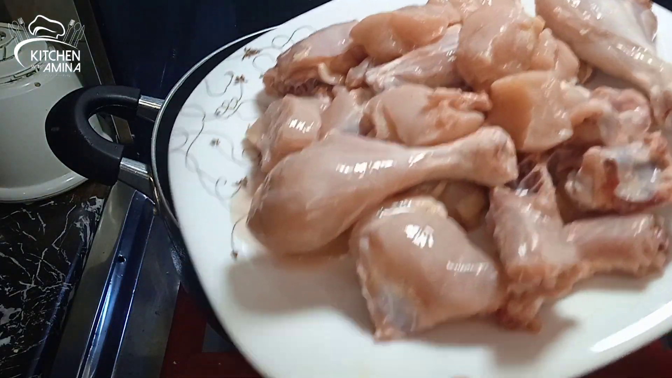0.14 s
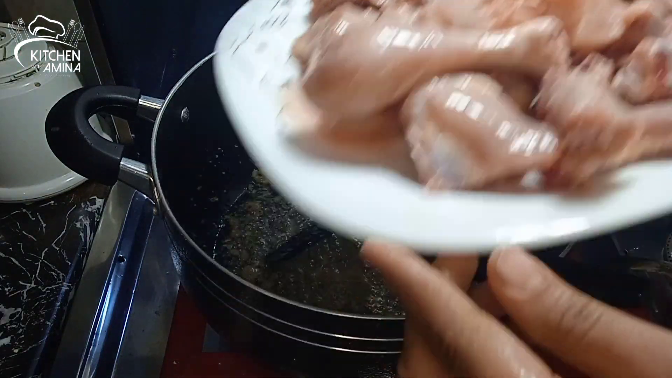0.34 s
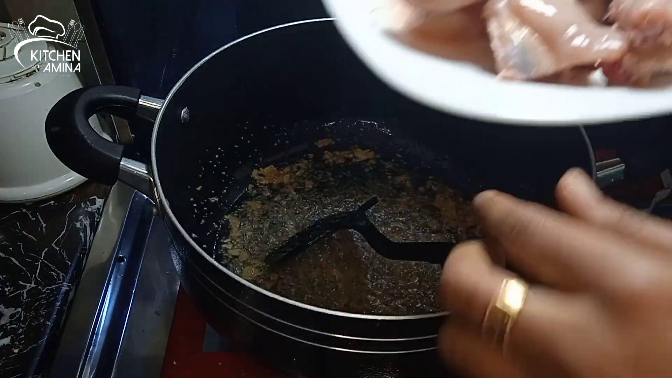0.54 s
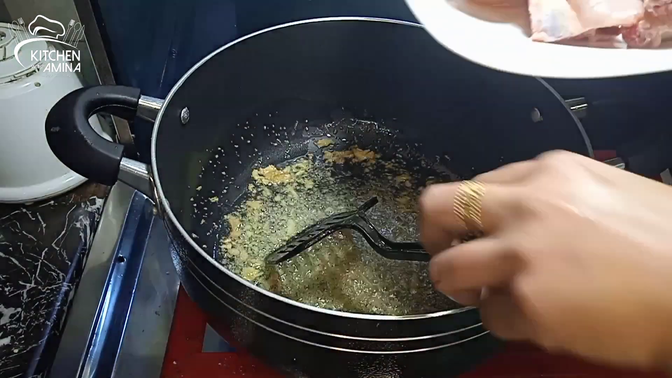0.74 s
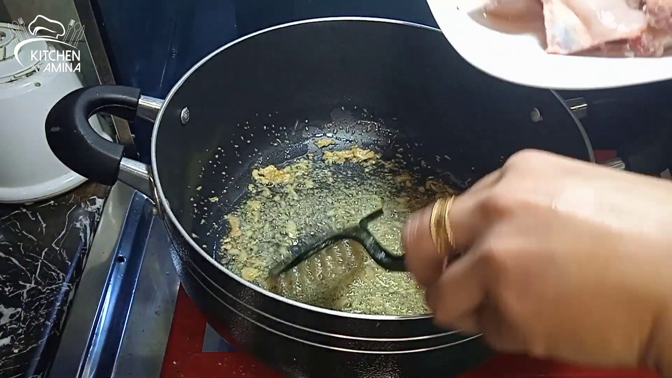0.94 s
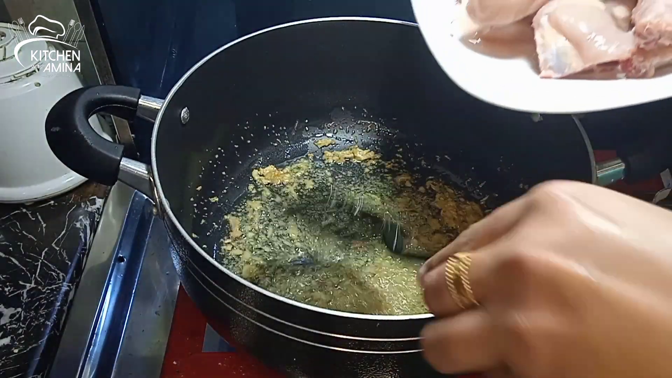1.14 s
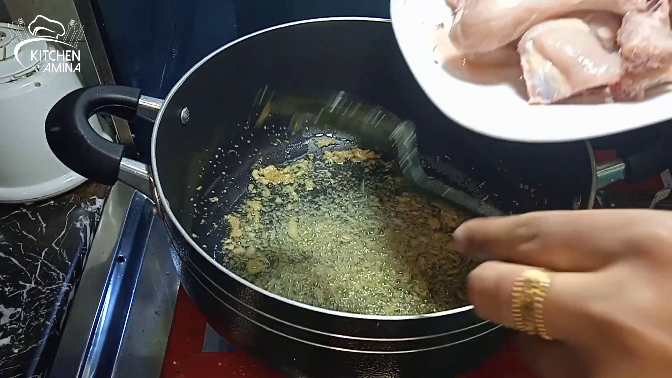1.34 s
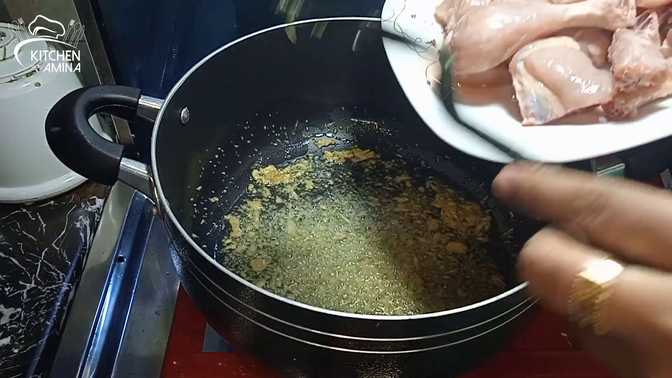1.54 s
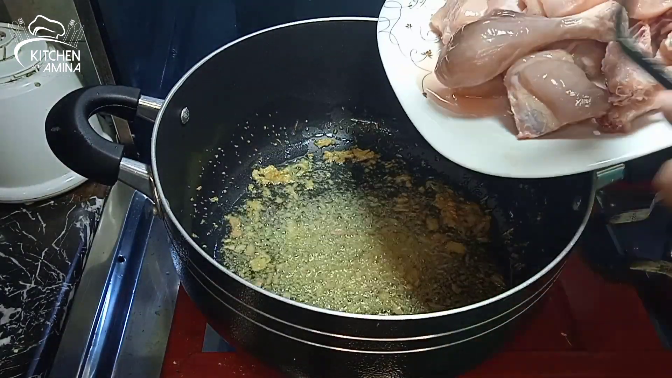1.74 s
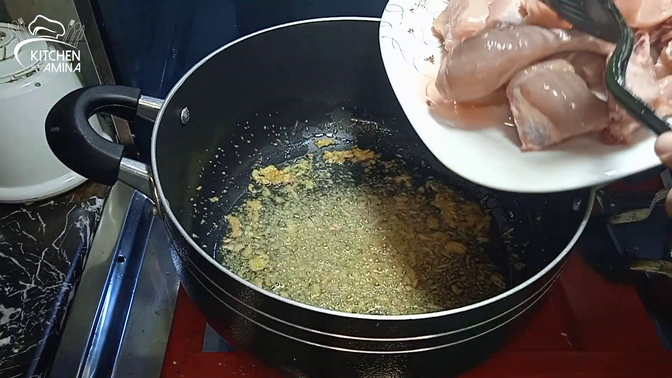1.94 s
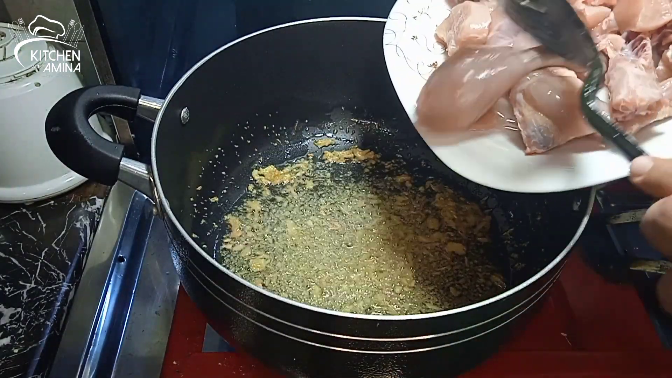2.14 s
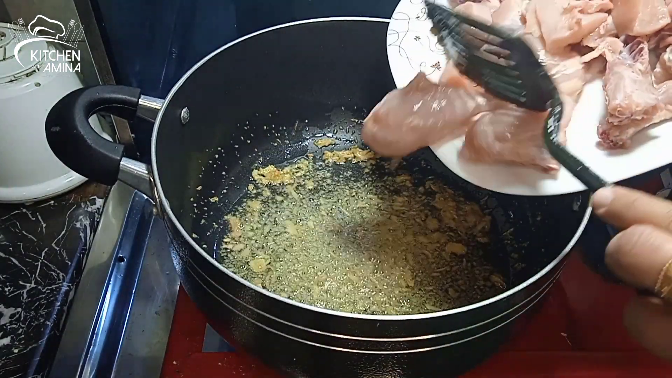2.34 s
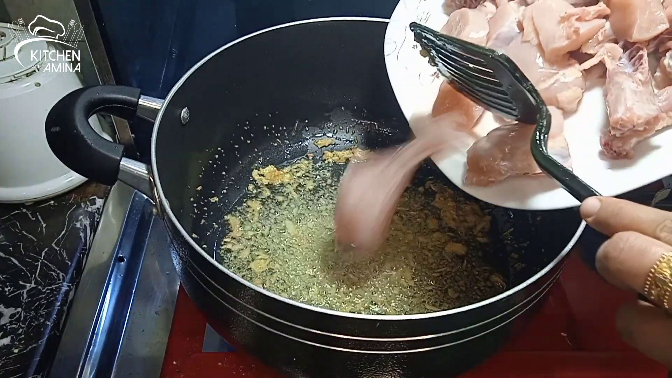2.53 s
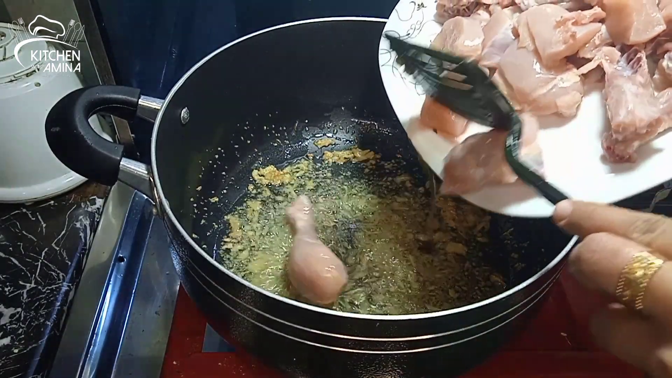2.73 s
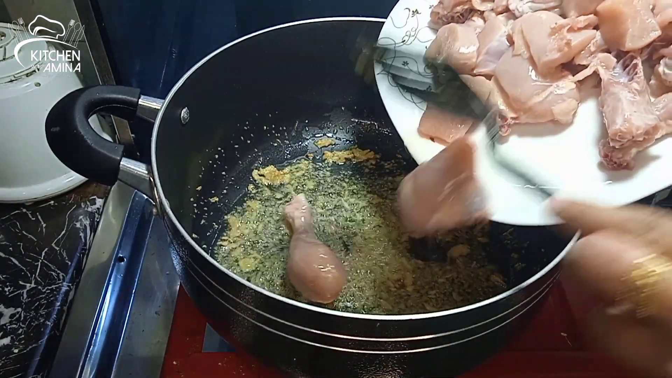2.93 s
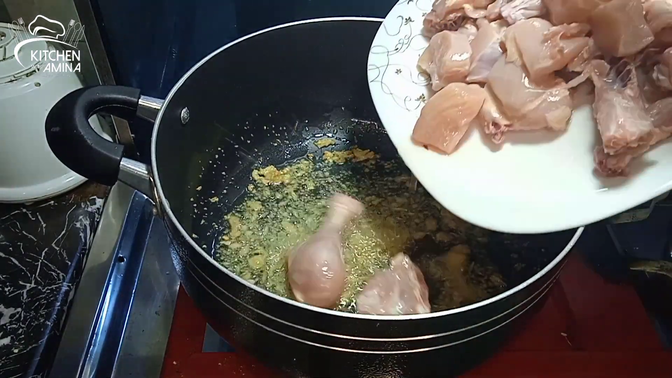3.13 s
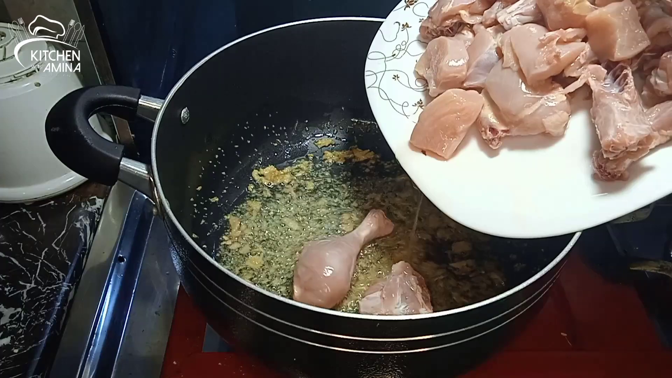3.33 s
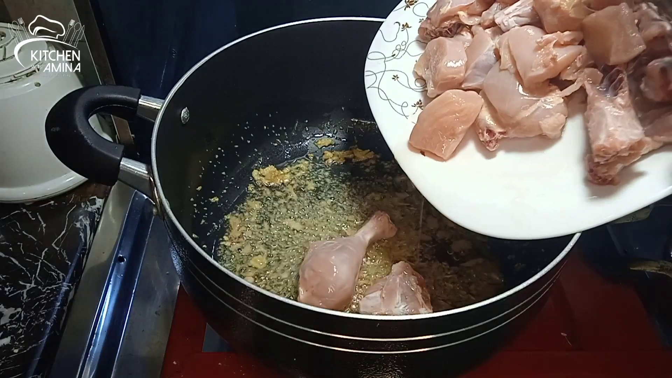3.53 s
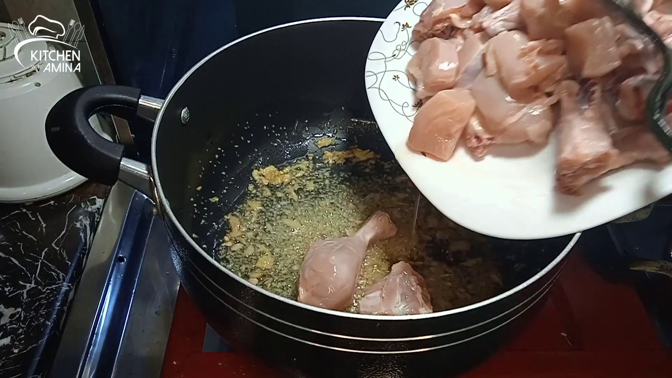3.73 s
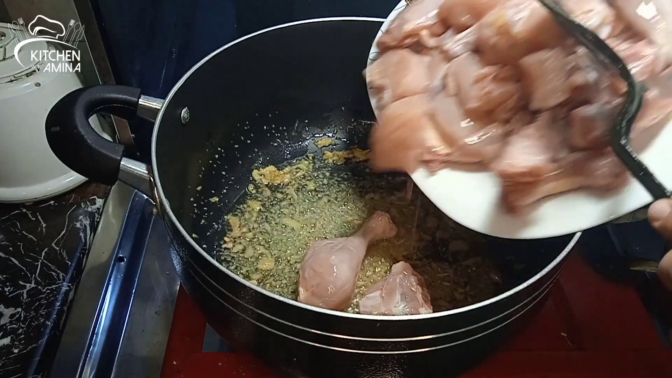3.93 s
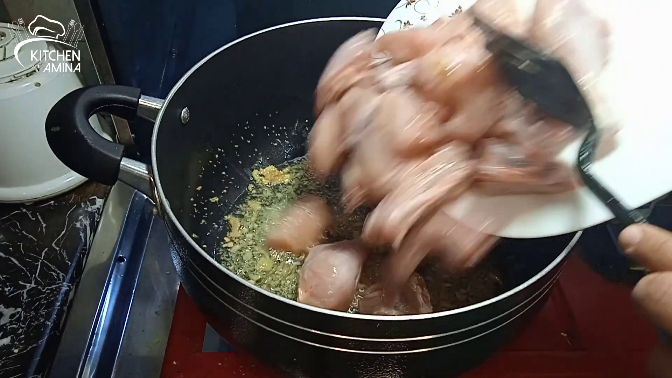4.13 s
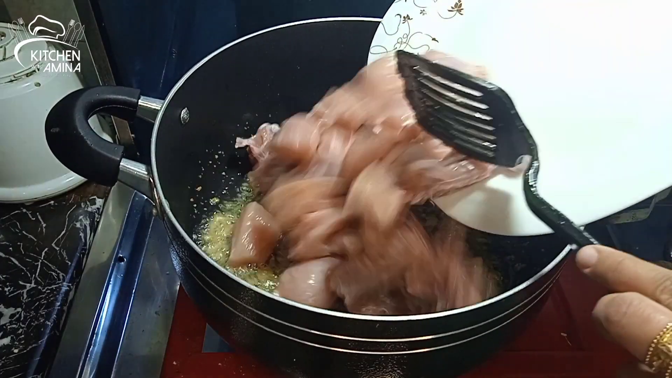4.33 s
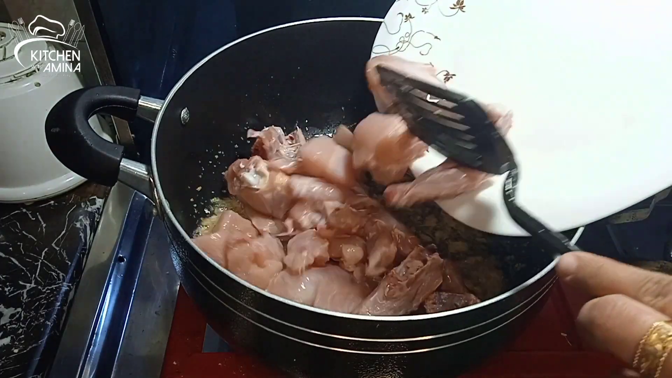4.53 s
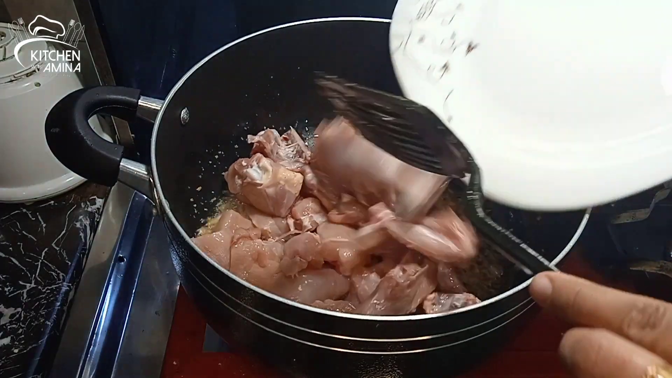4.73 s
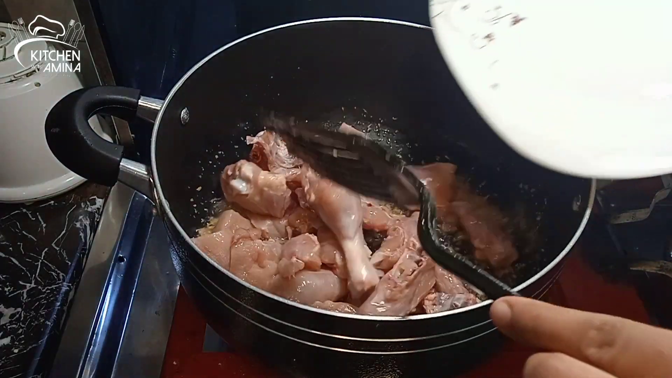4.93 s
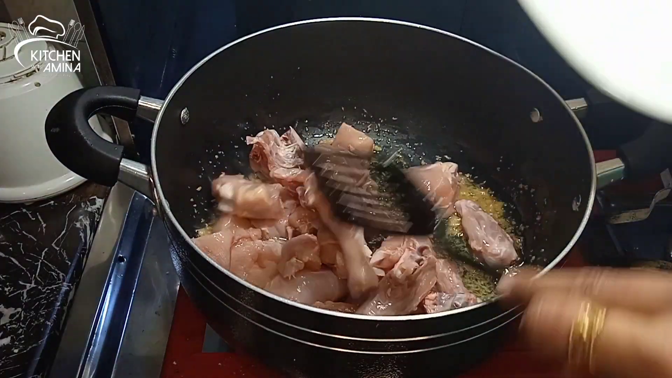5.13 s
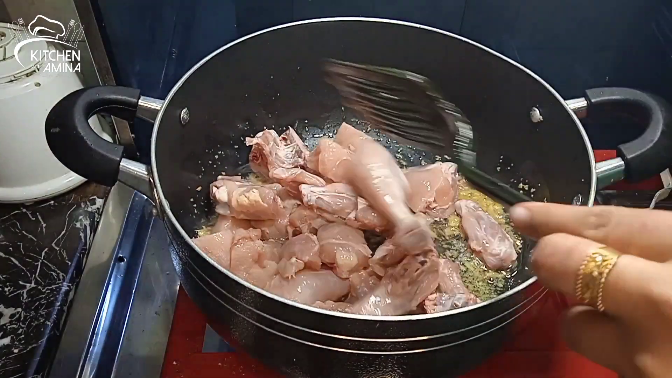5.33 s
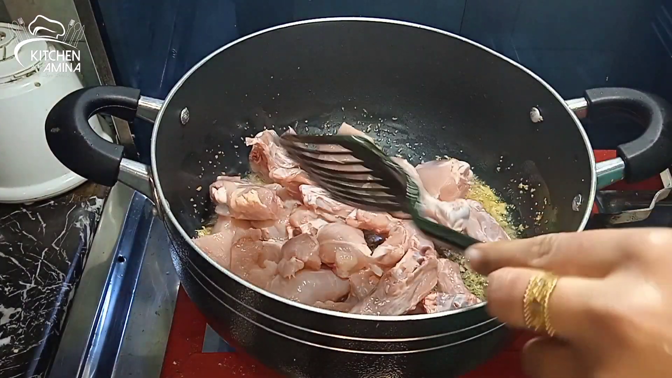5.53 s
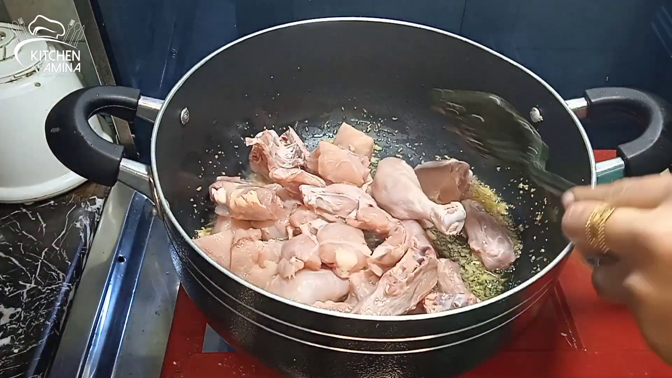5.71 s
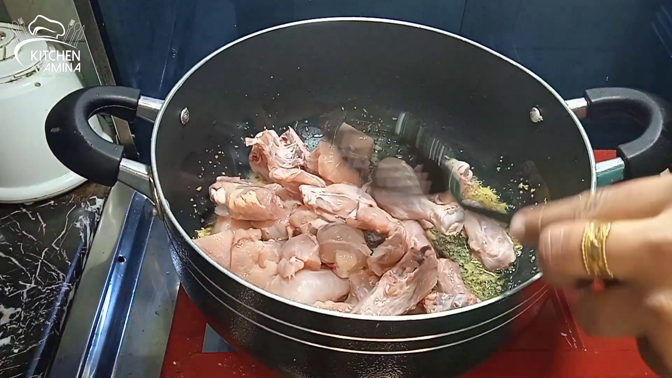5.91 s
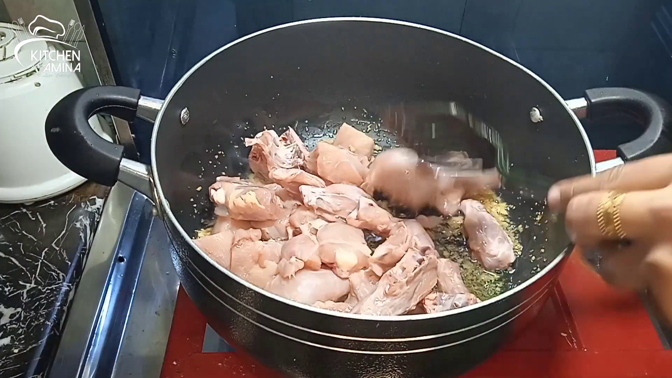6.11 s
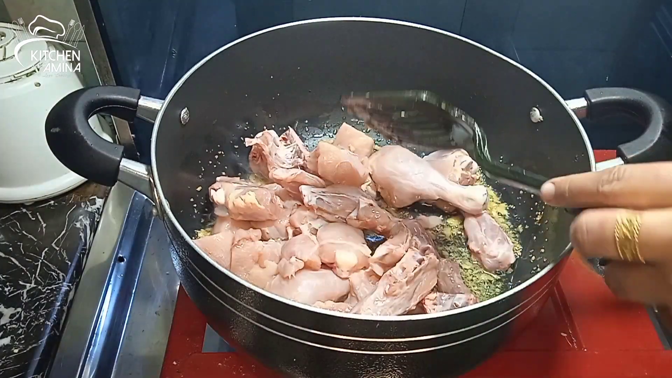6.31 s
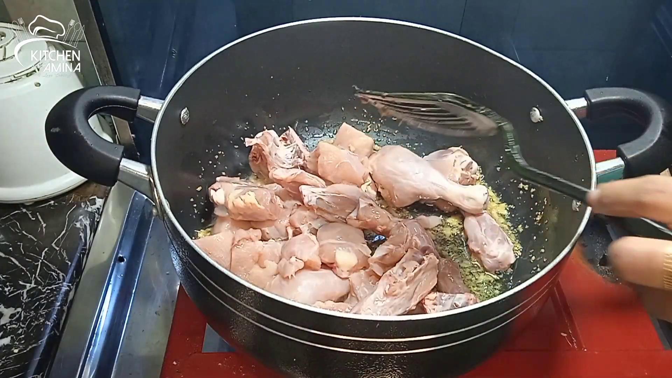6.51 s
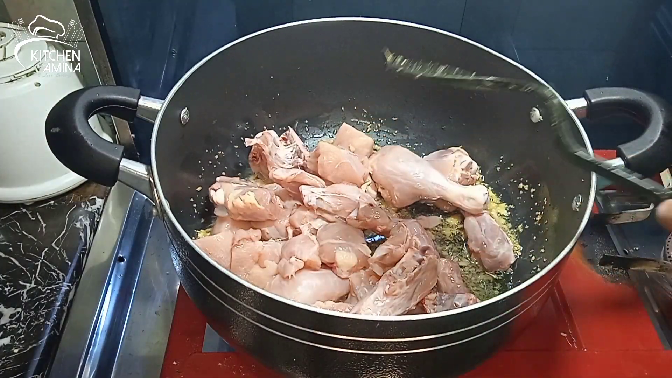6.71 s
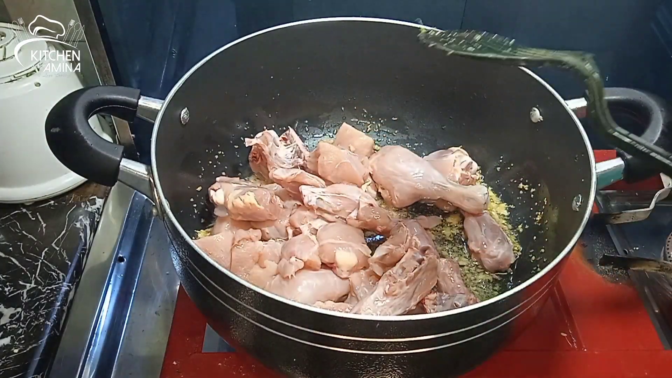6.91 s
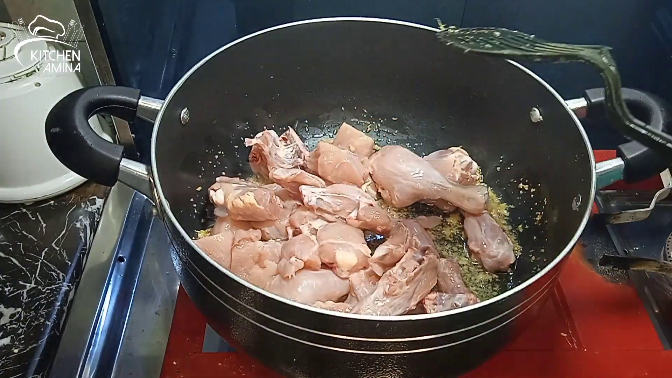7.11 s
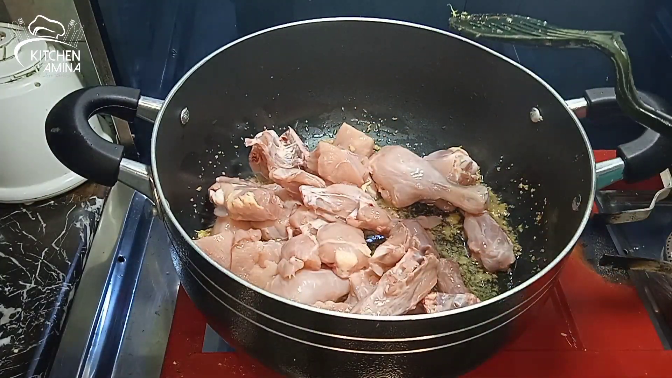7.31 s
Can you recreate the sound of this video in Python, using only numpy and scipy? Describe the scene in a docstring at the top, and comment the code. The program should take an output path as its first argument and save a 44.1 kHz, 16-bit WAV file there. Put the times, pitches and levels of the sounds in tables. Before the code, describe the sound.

Fine, bright frying sits over a soft burner rush, heard from near the pot in a small room. After light stirring, a hard spatula knock leads to ceramic and metal clatter on the rim and soft meat flops. Two quick bright clicks come before the main pile squelches and thumps into the pot. Denser wet sizzling and spitting droplets continue under brief scraping strokes, easing towards the end.

```python
"""Small kitchen, microphone close to a metal pot on a stove: spices fizz finely in hot oil over a low flame rush.
First a spatula stirs: noise grains for the scrapes, bright noise bursts for the ticks, a faint wavering tone.
Then raw chicken is pushed off a plate: damped low modes thud, and ringing modes clatter on the rim.
The wet meat adds a lower crackle of patchy grains, coloured by the air in the pot, and single droplets spit.
Last the spatula spreads the meat in short gritty strokes, while the fizz of the oil calms."""
import sys
import numpy as np
from scipy import signal
from scipy.fft import rfft, irfft, next_fast_len
from scipy.io import wavfile
from scipy.ndimage import uniform_filter1d, map_coordinates

SR = 44100
rng = np.random.default_rng(int(sys.argv[2]) if len(sys.argv) > 2 else 0)


def to_wav(sig):
    """Store sig (one row per channel, or 1-D mono) as 16-bit WAV at the path in sys.argv[1].

    Samples outside -1..1 are clipped; the rate is SR.
    """
    pcm = np.clip(np.atleast_2d(sig), -1, 1) * 32767
    pcm = np.round(pcm).astype(np.int16)
    wavfile.write(sys.argv[1], SR, pcm.T)  # frames by channels


N = 324576

# Spectra give relative density per Hz: each coloured noise is brought to rms 1 before its level is set.
# rush of the flame under the pot: f/Hz, density/dB
FLAME_SPECTRUM = [(25, -37), (60, -15.5), (100, 0), (150, -8), (210, -5.5), (330, -12), (440, 3), (560, -2),
                  (760, -12.5), (970, -1.5), (1150, -8.5), (2500, -22.5)]
# faint tone during the stirring: t/s, level/dB
TONE_LEVEL = [(.7, -70), (.86, -60.5), (.98, -66), (1.05, -58), (1.14, -67), (1.22, -57), (1.32, -73),
              (1.39, -57), (1.5, -78)]
TONE_HZ, TONE_SAG_HZ_PER_S = 700, 69  # the sag lasts to the end of the tone
# decay of the kitchen's answer: f/Hz, t60/s
KITCHEN_DECAY = [(150, 1), (1000, 0.28), (5000, .35), (15000, 0.17)]

# loaded pot swaying on its support: t/s, level/dB, f/Hz
POT_SWAYS = [(.99, -58, 94.3), (2.662, -35.5, 90.2), (3.141, -46, 96.4), (3.239, -44, 95), (4.36, -58, 88),
             (5.019, -57.5, 106.6), (5.8, -49, 106.3), (6.11, -57, 104.3)]
# tumbling meat and the spatula rock the pot on the stove: t/s, level/dB
POT_BUMPS = [(.975, -52.5), (1.6, -60.5), (2.665, -37), (2.726, -38), (3.129, -39.5), (4.261, -47.5),
             (4.329, -37.5), (4.432, -43.5), (4.691, -51), (5.785, -50)]
# boom of the stove top: f/Hz, density/dB
STOVE_SPECTRUM = [(30, -42), (65, -11.5), (92, -2), (115, -8), (138, -20), (180, -5.5), (250, -4),
                  (300, -11.5), (430, -1), (600, -11.5), (1200, -21), (3000, -58)]
# decay of that boom: f/Hz, t60/s
STOVE_DECAY = [(95, 1), (200, 0.81), (450, 0.11), (1500, 0.13)]
KNOCK_BOOM_DB = -16.5  # every knock on the rim rocks the pot too, this far below the knock

# meat sliding off the plate or pushed about: t/s, length/s, peak gain/dB
MEAT_SLIDES = [(1.06, 0.18, -60), (2.36, 0.32, -49), (2.6, 1, -57.5), (3.85, 0.17, -57.5),
               (4.06, 0.39, -51), (4.5, 0.365, -53.5), (4.86, 0.21, -52), (6.03, 0.25, -58)]
# colour of wet rubbing: f/Hz, density/dB
RUB_SPECTRUM = [(100, -9), (220, -11), (330, -13.5), (450, 5), (600, -12.5), (800, -5.5), (950, 0),
                (1200, -14.5), (2500, -18.5), (5000, -50)]
# spatula strokes through spices and meat: t/s, length/s, peak gain/dB
SPATULA_STROKES = [(.5, 0.039, -56), (.7, 0.12, -65), (4.3, 0.48, -63), (4.88, 0.25, -49),
                   (5.13, 0.22, -49.5), (5.39, .13, -51), (5.65, 0.13, -48.5), (6.03, 0.11, -53),
                   (6.18, 0.071, -52), (6.43, .1, -56), (6.85, 0.058, -48), (7.11, 0.025, -52)]
# colour of the blade on grit: f/Hz, density/dB
GRIT_SPECTRUM = [(700, -17), (1500, -1), (2200, -4), (2800, 4.5), (3250, 0.5), (3900, -2), (4700, -16),
                 (5700, -4.5), (7000, -19), (11000, -34)]
SLIDE_CREST, SCRAPE_CREST = 0.36, 0.76  # share of a stroke spent pressing harder

# sharp ticks of the spatula and spitting oil: t/s, relative level/dB, f/Hz, swell/s
SHARP_TICKS = [(0.218, -50, 2180, .0022), (0.525, -43, 5500, 0.0034), (.575, -53, 2120, 0.0036),
               (0.799, -51, 2200, 0.0039), (2.723, -42.5, 6100, .008), (3.125, -44.5, 6500, 0.01),
               (3.9963, -30.5, 4000, 0.0035), (4.3905, -35, 5400, .0013), (4.7491, -32.5, 5530, .0013),
               (4.765, -42, 5500, 0.0033), (4.9296, -37, 5700, 0.0014), (5.066, -35, 3100, 0.0012),
               (5.1396, -34, 3000, .0012), (5.1812, -36.5, 3060, 0.0014), (5.708, -36.5, 2370, 0.002),
               (6.237, -41, 2670, 0.0014), (6.751, -41, 1500, 0.0016), (6.8564, -37.5, 2800, .0007)]
# spatula taps on plate or pot, damped at once: t/s, level/dB, f/Hz, swell/s, low knock re tap/dB
SPATULA_TAPS = [(1.599, -44, 586, 0.0017, -10), (2.3431, 0.5, 957, 0.0007, -18),
                (2.552, -44.5, 1030, 0.0019, -10), (4, -21.5, 3850, 0.00093, -30),
                (4.0085, -27, 3780, 0.00057, -30), (5.767, -48, 4560, 0.0079, 2),
                (5.784, -46.5, 241.6, 0.02, -9)]
LOW_KNOCK_HZ, LOW_KNOCK_SWELL_S = 360, 0.002
# meat flopping down: t/s, level/dB, softness (1; stretches the blow and dulls it)
MEAT_FLOPS = [(2.649, -30, 1.36), (3.128, -45, 2.1), (4.155, -43, 0.91), (4.3195, -19, 0.88),
              (4.363, -44, 0.72)]
# what a flop of softness 1 sounds in the pot: f/Hz, level/dB, swell/s
POT_FLOP_MODES = [(171.5, -22, .012), (218, -15.5, 0.0096), (437, 2, 0.0069), (920, -4.5, 0.0026)]
DULL_DB_PER_KHZ = 39  # tilt about the second mode for each unit of softness above 1

# plate and spatula against the pot:
# t/s, level/dB, crack re knock/dB, pot wall re knock/dB, length share (1)
RIM_KNOCKS = [(2.3430, -27, 4.5, -10, 0.22), (2.8419, -20, 1, -2.5, 1), (2.9885, -31.5, -2, -5, 0.62),
              (3.1245, -41.5, 7.5, -1, 0.89), (3.2280, -22, -8, -23, 0.44), (3.3070, -33, -2, -17, 0.23),
              (3.3216, -32, -20, -13, 0.44), (3.385, -43, 5.5, 1.5, 0.74), (3.4804, -35, 0.5, -11.5, 0.53),
              (4.942, -36, -1, -13, 0.29), (5.139, -47.5, -5, -17, 0.57), (5.767, -39.5, 4.5, -8, 0.54)]
# modes of the plate, damped by hand and meat: f/Hz, level/dB, t60/s at length share 1
PLATE_MODES = [(437, -9.5, .15), (945.4, 1.5, 0.13), (985, -5.5, 0.14), (1110, -5.5, 0.071),
               (1223, -9, 0.1), (1566, -10, .12), (1840, -7.5, 0.13), (1880, -9, .13), (2340, -21, .14),
               (3163, -15.5, 0.13), (3850, -10, 0.08), (3880, -16, 0.14), (5100, -24, 0.11),
               (5800, -26.5, .13), (6670, -19.5, 0.13)]
# modes of the metal pot wall: f/Hz, level/dB, t60/s before every wall ring is shortened to 0.76 of it
WALL_MODES = [(249.6, -14.5, 0.56), (332.9, -10, 0.79), (1480, -16, 0.28), (1670, -13.5, .45),
              (1660, -14, 0.32), (1730, -13, 0.54), (1820, -14, .45), (1890, -15, 0.54), (2270, -27, 0.23),
              (2454, -21, 0.55), (2640, -20, .2), (3110, -17, 0.35), (3241, -17, .34), (3830, -35, 0.4),
              (4230, -41, 0.26), (5780, -17, 0.23)]
# noise of a hard contact: f/Hz, density/dB
CRACK_SPECTRUM = [(100, -19), (350, 7), (650, 2.5), (1000, -2), (1900, 2.5), (2700, -6.5), (3900, -6.5),
                  (4700, -7.5), (6800, -5.5), (8500, -22), (15000, -30)]
# decay of its rattle: f/Hz, t60/s at length share 1
RATTLE_DECAY = [(300, 0.52), (2000, 0.73), (7000, 0.34), (15000, 0.14)]

# oil livening when stirred and calming as cold meat covers it:
# t/s, relative fizz level/dB, finest spray level/dB
OIL_LEVELS = [(0, -59, -60), (.42, -58, -58), (.6, -55.5, -54), (4.4, -55, -54.5), (5.5, -55.5, -60.5),
              (7.36, -61.5, -65.5)]
# colour of the fizz: f/Hz, density/dB
FIZZ_SPECTRUM = [(2000, -12.5), (3500, -4.5), (4800, -8), (5900, 0.5), (7000, 3), (7900, -10), (9500, -9.5),
                 (10800, -17.5), (13000, -38)]
# colour of the finest spray: f/Hz, density/dB
SPRAY_SPECTRUM = [(8000, -17), (10800, -19.5), (12000, -12), (13900, -22), (14600, -3), (15600, -5.5)]
# meat meeting the oil and starting to sear: t/s, relative level/dB
MEAT_LANDINGS = [(2.55, -59), (2.93, -60.5), (4.13, -52.5), (4.26, -52.5), (4.5, -54)]
SEAR_RISE_S, SEAR_SETTLE_S, SEAR_SETTLED_DB = 0.029, 0.68, -6  # each flares up, then settles this far down
FLASH_S, FLASH_DB = 0.22, 1.5  # surface water flashes off as extra fizz
SPICE_DB = -62  # bubbling of the spices alone
# colour of the wet sizzle: f/Hz, density/dB
WET_SPECTRUM = [(150, -18), (400, -18), (700, 2.5), (1150, -2.5), (1400, 2), (2100, 3), (2450, 1.5),
                (3000, 3.5), (3700, 1), (4700, -7.5), (5800, -0.5), (7500, -8), (12000, -75)]
# air resonances inside the pot: f/Hz, width/Hz, lift/dB
POT_AIR = [(426, 20, 20), (940, 19, 12.5), (1370, 25, 7.5), (1560, 70, 1), (1789, 25, 8), (2145, 9.6, 10)]
TOP_HZ = 15800  # band limit of the recorder


def amp(db):
    """Decibels to gain."""
    return 10 ** (np.asarray(db) / 20)


def unit(x):
    """Scale to rms 1."""
    return x / np.sqrt(np.mean(x ** 2) + 1e-20)


def along(points, hz):
    """Read (f/Hz, value) points on a log frequency axis."""
    f, value = np.transpose(points)
    return np.interp(np.log(hz + 1), np.log(f + 1), value)


def curves(rows):
    """One value per sample for each column after the time."""
    s, *columns = np.transpose(rows)
    return [np.interp(np.arange(N) / SR, s, column) for column in columns]


def wobble(rate):
    """A smooth random curve through this many knots a second."""
    knots = rng.standard_normal(int(N * rate / SR) + 4)
    return map_coordinates(knots, [np.arange(N) * rate / SR])


def filtered(x, response):
    """Multiply the spectrum of x by a response of frequency."""
    size = next_fast_len(len(x) + 8192)  # padding keeps the end from wrapping onto the start
    spectrum = rfft(x, size) * response(np.fft.rfftfreq(size, 1 / SR))
    return irfft(spectrum, size)[:len(x)]


def coloured(x, spectrum):
    """Weight x by a spectrum and bring it to rms 1."""
    return unit(filtered(x, lambda hz: amp(along(spectrum, hz))))


def dying(x, decay):
    """Let each frequency of x fade with its own t60."""
    hz, t, bins = signal.stft(x, SR, nperseg=256)
    fade = amp(-60 * t / along(decay, hz)[:, None])
    return signal.istft(bins * fade, SR, nperseg=256)[1][:len(x)]


def swell(t, peak_s):
    """A contact that builds to 1 and dies away."""
    return t / peak_s * np.exp(1 - t / peak_s)


def add(track, s, sound):
    """Mix a sound into the track at time s."""
    part = track[round(s * SR):][:len(sound)]
    part += sound[:len(part)]


def grains(per_second, spread_db, bed_db):
    """Tiny random impulses of uneven size over a bed of white noise, as from countless smaller ones."""
    bursts = rng.random(N) < per_second / SR
    size = amp(spread_db * np.clip(rng.standard_normal(N), -3, 2))
    impulses = unit(bursts * size * rng.choice([-1, 1], N))
    return impulses + amp(bed_db) * rng.standard_normal(N)


def patchy(x, depth_db):
    """Raise and lower x in brief flurries, each in its own part of the spectrum."""
    bins = signal.stft(x, nperseg=256)[2]
    field = rng.standard_normal(bins.shape)
    field = uniform_filter1d(field, size=5, axis=0)  # across frequency
    field = uniform_filter1d(field, size=6, axis=1)  # across time
    return signal.istft(bins * amp(depth_db * unit(field)), nperseg=256)[1][:len(x)]


def strokes(rows, crest):
    """Pressure builds to a crest and eases off in each stroke; one gain per sample."""
    t, gain = np.arange(N) / SR, np.zeros(N)
    for s, length, db in rows:
        press = np.interp(t, [s, s + crest * length, s + length], [0, 1, 0])
        gain += amp(db) * np.sin(np.pi / 2 * press)
    return gain


def burner():
    """The flame under the pot is a nearly steady, low rush of coloured noise."""
    return amp(-63 + 0.45 * wobble(7.1)) * coloured(rng.standard_normal(N), FLAME_SPECTRUM)


def kitchen(x):
    """The kitchen walls answer with a short noise tail whose frequencies fade at their own speeds."""
    tail = dying(rng.standard_normal(SR // 2), KITCHEN_DECAY)
    return signal.fftconvolve(x, tail / np.linalg.norm(tail))[:N]


def tone():
    """A faint sine wavers in pitch and level and sinks slowly."""
    db, = curves(TONE_LEVEL)
    t = np.arange(N) / SR
    start, end = TONE_LEVEL[0][0], TONE_LEVEL[-1][0]
    hz = TONE_HZ - TONE_SAG_HZ_PER_S * np.clip(t - start, 0, 1)
    waver = 1 + .025 * wobble(110) + .012 * wobble(12)
    phase = 2 * np.pi * np.cumsum(hz * waver) / SR
    flutter_db = 2 * wobble(60)
    return amp(db + flutter_db) * unit(np.sin(phase)) * (t > start) * (t < end)


def sways():
    """The heavy pot hums on after a jolt: decaying low sines with a soft onset."""
    out, t = np.zeros(N), np.arange(SR) / SR
    for s, db, hz in POT_SWAYS:
        fade = amp(db - 60 * t / 1.0)  # t60 of 1 s
        onset = 1 - np.exp(-t / 0.0068)
        add(out, s, fade * onset * np.sin(2 * np.pi * hz * t))
    return out


def bumps():
    """Weight landing in the pot or on its rim sets it booming on the stove top, lows fading slowest."""
    out, t = np.zeros(N), np.arange(SR) / SR
    from_knocks = [(s, db + KNOCK_BOOM_DB) for s, db, *_ in RIM_KNOCKS]
    for s, db in list(POT_BUMPS) + from_knocks:
        boom = dying(coloured(rng.standard_normal(SR), STOVE_SPECTRUM), STOVE_DECAY)
        add(out, s, amp(db) * boom * (1 - np.exp(-t / 0.0013)))
    return out


def slide():
    """Wet meat sticks and slips on plate and pot, grain by grain: a soft hollow squelch."""
    slips = grains(300, spread_db=-1, bed_db=-7.5) * amp(1.3 * wobble(35))
    return strokes(MEAT_SLIDES, SLIDE_CREST) * coloured(slips, RUB_SPECTRUM)


def scrape():
    """The blade catches and slips on grit in uneven spurts."""
    catches = grains(900, spread_db=3.5, bed_db=-3) * amp(2.5 * wobble(60))
    return strokes(SPATULA_STROKES, SCRAPE_CREST) * coloured(patchy(catches, depth_db=2.5), GRIT_SPECTRUM)


def ticks():
    """Spatula and spitting oil tick in brief bright noise bursts, each round its own pitch."""
    out, t = np.zeros(N), np.arange(SR // 12) / SR
    for s, db, hz, peak_s in SHARP_TICKS:
        band = [(hz / 4, -28), (hz / 1.21, -12), (hz, 0), (hz * 1.36, -12), (hz * 3.0, -35)]
        noise = coloured(rng.standard_normal(len(t)), band)
        add(out, s, amp(db - 3.5) * swell(t, peak_s) * noise)
    return out


def thud(modes):
    """A blow from (f/Hz, level/dB, swell/s) modes, damped at once, with a little contact noise riding on it."""
    t = np.arange(SR // 2) / SR
    slap = amp(-27.5) * coloured(rng.standard_normal(len(t)), CRACK_SPECTRUM)
    blow = np.zeros(len(t))
    for hz, db, peak_s in modes:
        blow += amp(db) * swell(t, peak_s) * (slap - np.sin(2 * np.pi * hz * t))
    return blow


def thuds():
    """Hard taps of the spatula and soft flops of meat; a softer flop is longer and duller."""
    out = np.zeros(N)
    for s, db, hz, peak_s, low_db in SPATULA_TAPS:
        modes = [(hz, 0, peak_s), (LOW_KNOCK_HZ, low_db, LOW_KNOCK_SWELL_S)]
        add(out, s, amp(db) * thud(modes))
    main_hz = POT_FLOP_MODES[1][0]
    for s, db, soft in MEAT_FLOPS:
        modes = []
        for hz, level, peak_s in POT_FLOP_MODES:
            loss_db = DULL_DB_PER_KHZ * (soft - 1) * (hz - main_hz) / 1000
            modes.append((hz, level - loss_db, peak_s * soft))
        add(out, s, amp(db) * thud(modes))
    return out


def ring(modes, t, length):
    """Decaying modes, at new random strengths and phases for each blow."""
    out = np.zeros(len(t))
    for hz, db, t60 in modes:
        strength, phase = rng.standard_normal(2)
        fade = amp(db + 3.1 * strength - 60 * t / (t60 * length))
        out += fade * np.sin(2 * np.pi * (hz * t + phase))
    return out


def knocks():
    """The plate hits the rim and chatters; pressed against the pot, it damps the ring of the wall."""
    out, t = np.zeros(N), np.arange(SR) / SR
    for s, db, crack_db, wall_db, length in RIM_KNOCKS:
        tones = ring(PLATE_MODES, t, length) + amp(wall_db) * ring(WALL_MODES, t, 0.76)
        build = 1 - np.exp(-t / 0.0017)  # the ring grows while the contact lasts
        noise = coloured(rng.standard_normal(SR), CRACK_SPECTRUM)
        rattle = dying(noise, [(hz, t60 * length) for hz, t60 in RATTLE_DECAY])
        snap = noise * amp(-60 * t / 0.023)
        crack = (amp(-2.5) * snap + amp(-14.5) * rattle) * (1 - np.exp(-t / 0.0003))
        add(out, s, amp(db) * (tones * build + amp(crack_db) * crack))
    return out


def searing(settle_s, settled):
    """Gain of the searing meat: each landing flares up and settles to a share of its peak; powers add."""
    power = np.zeros(N)
    for s, db in MEAT_LANDINGS:
        age = np.maximum(np.arange(N) / SR - s, 0)
        fade = settled ** 2 + (1 - settled ** 2) * np.exp(-age / settle_s)
        power += amp(db) ** 2 * (1 - np.exp(-age / SEAR_RISE_S)) * fade
    return np.sqrt(power)


def boiling():
    """How hard water boils out of spices and meat, as a gain."""
    return np.hypot(amp(SPICE_DB), searing(SEAR_SETTLE_S, amp(SEAR_SETTLED_DB)))


def oil():
    """Spices fizz in the oil as dense fine grains, flaring when meat lands."""
    fizz_db, spray_db = curves(OIL_LEVELS)
    fizz_froth = grains(2500, spread_db=5, bed_db=0)
    spray_froth = grains(2500, spread_db=5, bed_db=0)
    level = np.hypot(amp(fizz_db), amp(FLASH_DB) * searing(FLASH_S, 0))
    fizz = level * amp(-1.4 + 1.0 * wobble(25)) * coloured(fizz_froth, FIZZ_SPECTRUM)
    spray = amp(spray_db + .35 * wobble(25)) * coloured(spray_froth, SPRAY_SPECTRUM)
    return fizz + spray


def spits(per_second, mid_hz, size_db, octaves, cycles):
    """Single droplets burst above the sizzle, each ringing briefly at its own pitch."""
    level = boiling()
    out, t = np.zeros(N), np.arange(SR // 50) / SR
    for when, size, pitch in rng.random((int(per_second * N / SR), 3)):
        i = int(when * N)
        offset = np.arcsin(2 * pitch - 1) / (np.pi / 2)  # -1 to 1, crowding round the middle
        hz = mid_hz * 2 ** (octaves * offset)
        gain = level[i] * amp(size_db + 13 * size ** 3)  # few droplets are large
        add(out, i / SR, gain * swell(t, cycles / hz) * np.sin(2 * np.pi * hz * t))
    return out


def pot_air(f):
    """Response of the air in the pot: the direct sound plus a resonance at each hollow pitch."""
    response = 1
    for centre, width, lift_db in POT_AIR:
        damping = 1j * f * width
        response = response + (amp(lift_db) - 1) * damping / (centre * centre - f * f + damping)
    return response


def sizzle():
    """Water boils off in larger bubbles, in flurries, and sounds the hollow of the pot."""
    pops = patchy(grains(1100, spread_db=5, bed_db=-.5), depth_db=2.1)
    return boiling() * amp(0.85 * wobble(11)) * coloured(filtered(pops, pot_air), WET_SPECTRUM)


def scene():
    """The handling, the blows and their echo, with the frying close by."""
    handling = bumps() + sways() + slide() + scrape()
    hard, soft = knocks() + ticks(), thuds()
    echo = kitchen(amp(-9.5) * hard + amp(-21.5) * soft)
    crackle = spits(per_second=90, mid_hz=2800, size_db=-8, octaves=1.2, cycles=1.8)
    blisters = spits(per_second=30, mid_hz=2700, size_db=-8, octaves=1.1, cycles=5)
    frying = oil() + sizzle() + crackle + blisters
    return (burner() + tone() + handling + hard + soft + echo + frying)[None]


def record(dry):
    """The microphone drops the deepest bass; the recorder clips at full scale, then cuts above its band limit."""
    high_pass = signal.butter(2, 48, "high", fs=SR, output="sos")
    thin = signal.sosfilt(high_pass, dry[0])
    return filtered(np.clip(thin, -1, 1), lambda hz: hz < TOP_HZ)[None]


dry = scene()
out = record(dry)
to_wav(out)
```